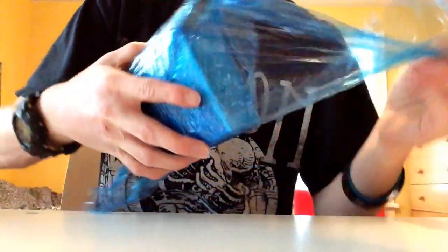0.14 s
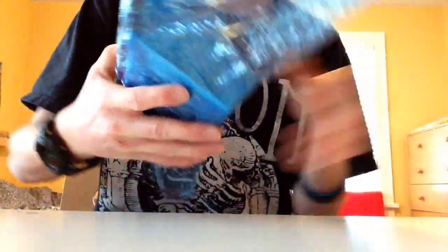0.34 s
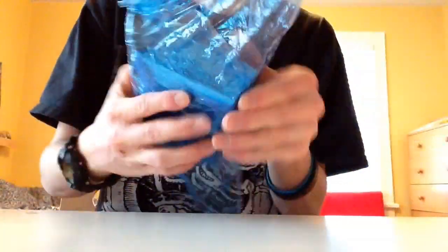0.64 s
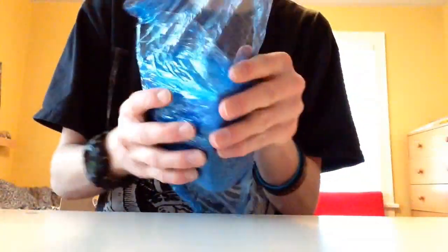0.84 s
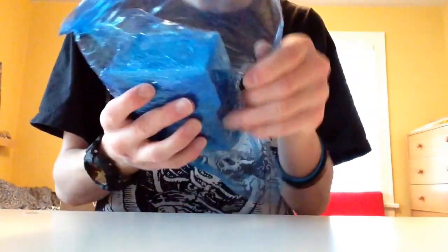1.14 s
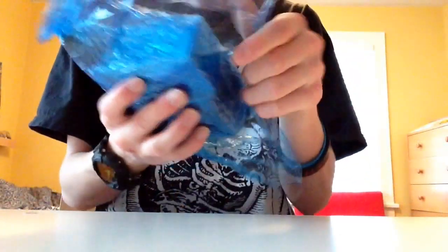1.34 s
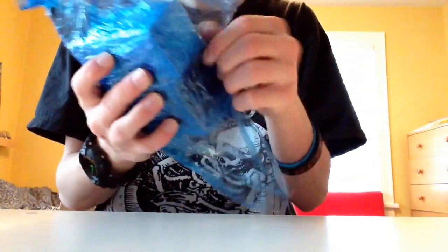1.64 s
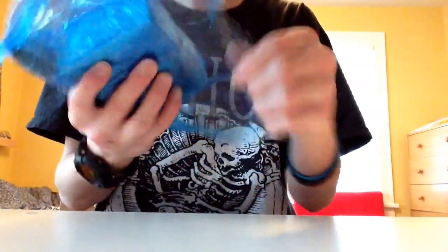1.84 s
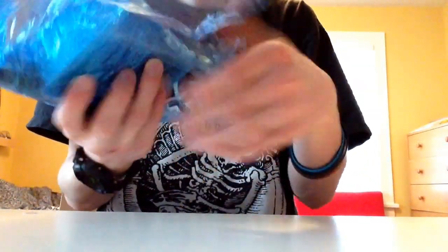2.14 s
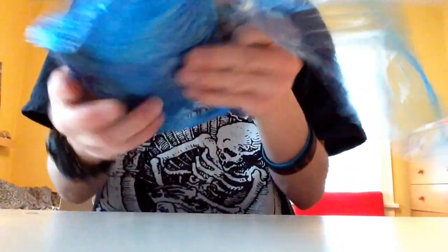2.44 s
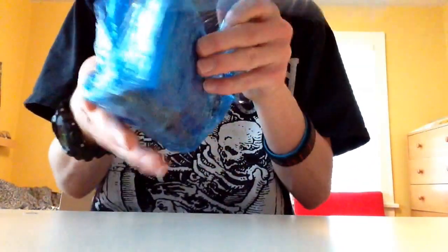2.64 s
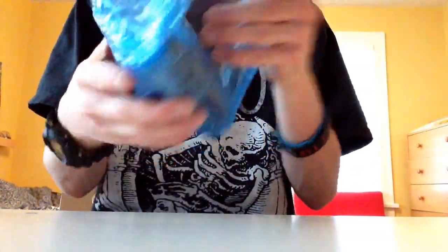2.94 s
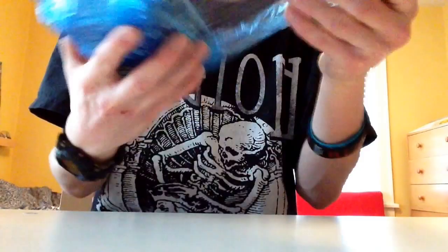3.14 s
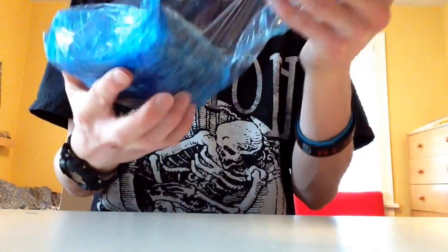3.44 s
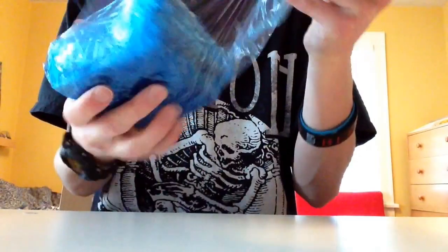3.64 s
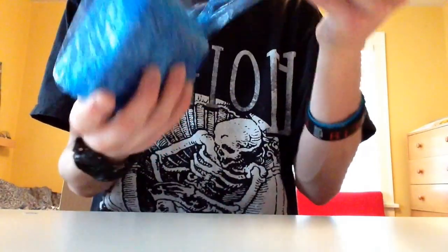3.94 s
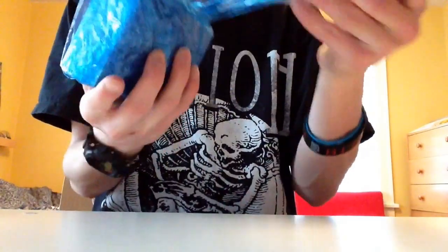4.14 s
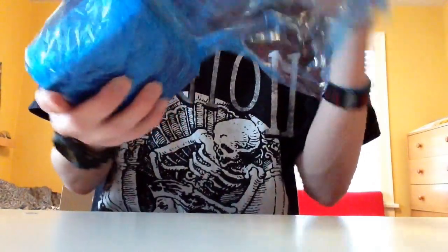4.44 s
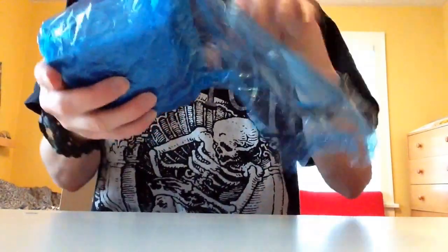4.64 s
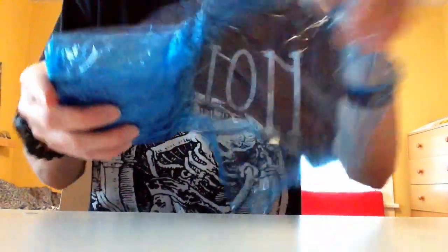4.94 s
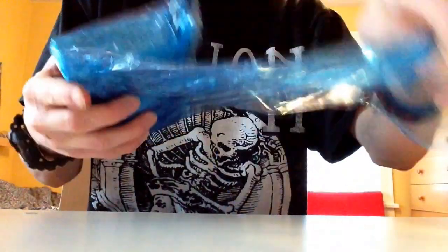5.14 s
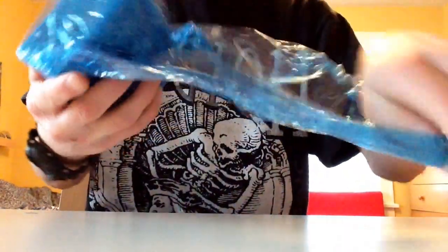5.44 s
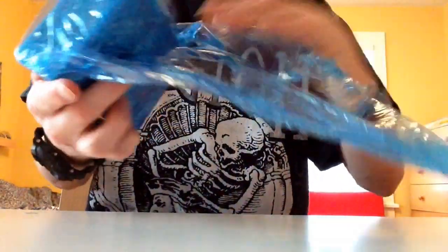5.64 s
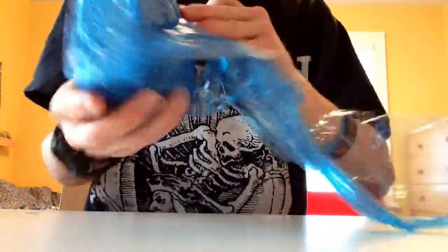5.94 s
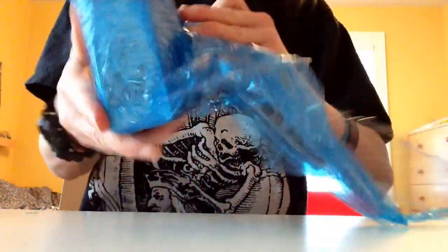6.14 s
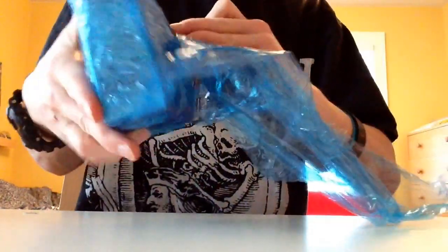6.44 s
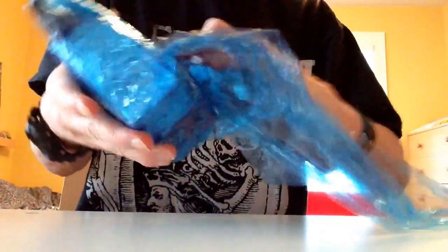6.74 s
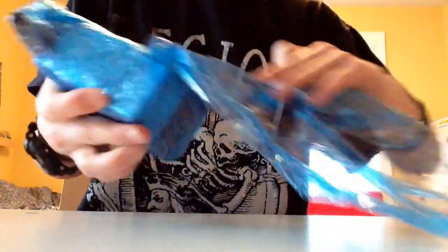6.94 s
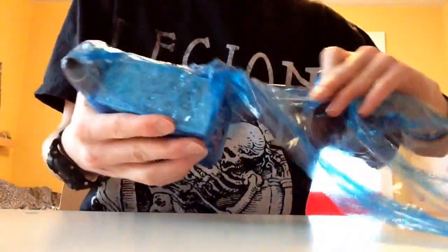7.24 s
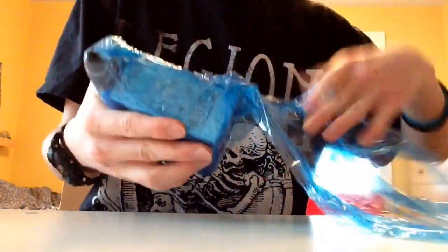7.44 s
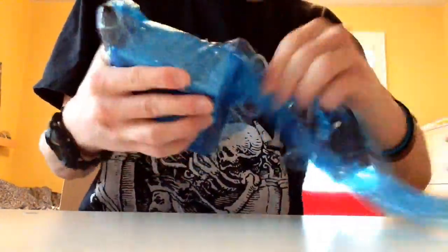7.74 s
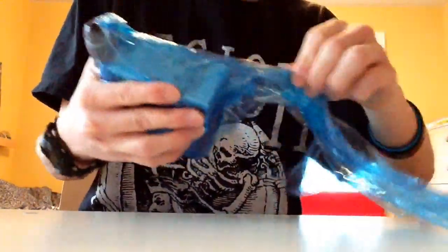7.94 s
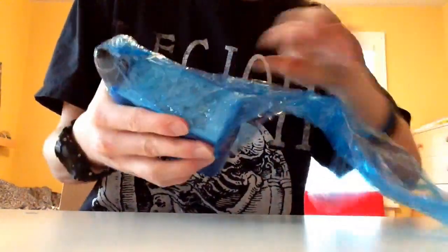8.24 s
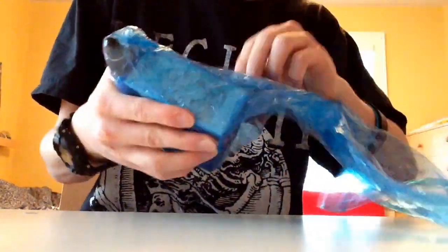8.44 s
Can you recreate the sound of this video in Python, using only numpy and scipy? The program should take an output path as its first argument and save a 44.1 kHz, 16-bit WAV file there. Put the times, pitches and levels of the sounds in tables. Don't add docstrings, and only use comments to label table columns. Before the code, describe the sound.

Close, bright crackle of thin plastic wrap being tugged and unwound at a table. Swarms of tiny creases pop, single folds snap, and stuck layers part in short buzzing rips. Activity surges early and around the middle, sinks to faint rustles, then returns with the loudest cracks near the end. Low unsteady rumble and slight thumps lie underneath, with very little room echo.

```python
import sys
import numpy as np
from scipy import signal
from scipy.fft import rfft, irfft
from scipy.io import wavfile
from scipy.ndimage import uniform_filter1d, map_coordinates

SR = 44100
rng = np.random.default_rng(int(sys.argv[2]) if len(sys.argv) > 2 else 0)


def voltage_ratio(level):
    return 10 ** (np.asarray(level, float) / 20)


def generate_wav(signal):
    frames = np.transpose(np.atleast_2d(signal))
    scaled = np.clip(frames, -1, 1) * 32767
    pcm = np.round(scaled).astype(np.int16)
    wavfile.write(sys.argv[1], SR, pcm)


N = 379260


def evened(x):
    return x / np.sqrt(np.mean(x ** 2) + 1e-20)


def read(points, hz):
    f, value = np.transpose(points)
    return np.interp(np.log(hz + 1), np.log(f + 1), value)


def along(rows):
    s, *columns = np.transpose(rows)
    return [np.interp(np.arange(N) / SR, s, c) for c in columns]


def coloured(x, points):
    gain_db = read(points, np.fft.rfftfreq(len(x), 1 / SR))
    return irfft(rfft(x) * voltage_ratio(gain_db), len(x))


def add(mix, s, sound):
    part = mix[round(s * SR):][:len(sound)]
    part += sound[:len(part)]


def wander(per_s):
    knots = rng.standard_normal(N // 64 + 2)
    span = max(int(SR / 64 / per_s), 1)
    smooth = uniform_filter1d(uniform_filter1d(knots, span), span)
    return np.repeat(evened(smooth), 64)[:N]


def surge(s, db, rise, hold, fall):
    u = np.arange(0, N, 32) / SR - s
    rise_power = 1.87
    swell = np.clip(1 + u / max(rise, .004), 0, 1) ** (2 * rise_power)
    slackening_db = 40 * np.maximum(u - hold, 0) / max(fall, .01)
    return swell * voltage_ratio(2 * db - slackening_db)


def power_db(surges, under_db):
    return 10 * np.log10(np.repeat(sum(surges), 32)[:N] + voltage_ratio(2 * under_db))


def ping(hz, cycles):
    turns = np.arange(1, 700) / SR * hz
    fade = np.exp(-turns / cycles * 2) * (1 - np.exp(-turns * 57.0))
    ring = np.sin(2 * np.pi * turns) * fade
    return ring - fade * ring.sum() / fade.sum()


def pull():
    # full_s, effort_db, rise_s, hold_s, slackening_s
    tugs = [(0.0, -37, 0.454, 0.14, 0.021), (0.63, -46.5, 0.077, 0.23, 0.2),
            (0.922, -27.5, 0.042, 0.13, 0.041), (1.694, -35, 0.26, 0.001, 0.011),
            (1.812, -23, 0.2, 0.011, 0.085), (2.041, -39.5, 0.13, 0.004, 0.32),
            (2.329, -33.5, 0.13, 0.0044, 0.022), (2.43, -35.5, 0.18, 0.001, 0.31),
            (2.892, -24.5, 0.18, 0.27, 0.065), (3.287, -46, 0.34, 0.2, 0.23),
            (3.891, -21, 0.089, 0.0061, 0.1), (4.235, -38, 0.082, 0.056, 0.16),
            (4.642, -43.5, 0.012, 0.4, 0.018), (4.966, -25, 0.077, 0.0027, 0.2),
            (5.038, -21, 0.038, 0.0099, 0.14), (5.119, -28.5, .004, 0.0018, 0.1),
            (5.11, -35, 0.0074, 0.32, 0.084), (5.667, -41, 0.065, 0.22, 0.12),
            (6.859, -24.5, 0.31, 0.062, 0.19), (7.044, -28.5, 0.038, 0.012, 0.046),
            (7.172, -21, 0.083, 0.0014, 0.16), (7.305, -41, 0.008, 0.18, 0.14),
            (7.728, -21, 0.12, 0.087, 0.056), (7.88, -33, 0.014, 0.049, 0.092),
            (8.561, -22, 0.29, 0.017, 0.055)]
    # peak_s, effort_db, length_s
    twitches = [(0.191, -44, 0.028), (0.283, -51, 0.078), (0.425, -49, 0.043), (0.531, -42.5, 0.091),
                (0.667, -37.5, 0.051), (1.217, -47, 0.034), (1.271, -33.5, 0.038), (1.473, -48.5, 0.022),
                (1.505, -44.5, 0.03), (1.632, -28.5, 0.048), (2.319, -29, 0.012), (2.887, -24, 0.0098),
                (3.144, -22, 0.011), (5.171, -31, 0.0084), (5.27, -31, 0.009), (2.467, -27, 0.028),
                (2.608, -33, 0.026), (2.706, -38.5, 0.046), (2.777, -30.5, 0.02), (3.603, -38, 0.039),
                (4.104, -39, 0.023), (4.348, -34, 0.044), (4.49, -51.5, 0.026), (4.709, -37, 0.034),
                (5.309, -28.5, 0.045), (5.557, -38, 0.035), (5.882, -36, 0.07), (5.973, -39, 0.064),
                (6.15, -42, 0.12), (6.25, -38.5, 0.056), (6.467, -37, 0.036), (6.493, -44, 0.15),
                (6.64, -37.5, 0.043), (7.649, -37, .02), (8.376, -35, .04), (8.116, -26.5, 0.03),
                (8.315, -39, 0.027), (8.332, -44.5, 0.041), (8.505, -21, 0.079)]
    # time_s, effort_db
    settling = [(0.0, -29.5), (0.329, -60), (0.763, -45.5), (1.425, -58), (2.051, -70.5), (3.564, -52),
                (4.035, -40.5), (4.516, -63.5), (5.041, -38.5), (5.491, -53.5), (6.145, -47.5),
                (6.605, -50), (7.145, -41.5), (7.674, -79), (8.022, -39.5), (8.24, -51), (8.285, -59),
                (8.6, -38)]
    surges = [surge(*row) for row in tugs]
    surges += [surge(s, db, length, 0, 0.95 * length) for s, db, length in twitches]
    return uniform_filter1d(power_db(surges, along(settling)[0]), size=200)


def crinkle():
    # lowest_hz, highest_hz, ringing_cycles
    folds = [
        (276, 1560, 1.65),
        (1440, 6000, 1.7),
        (6000, 18000, 5.5),
    ]
    # time_s, large_folds_db, fine_folds_db
    grip = [(0, -3, 0.5), (.75, -2.5, -0.5), (.97, -2, -3), (1.25, 5, 3.5), (1.5, -1.5, -4.5),
            (1.7, 1.5, -0.5), (1.95, -1.5, -2), (3.1, -2, 0.5), (3.7, -2, -9), (3.93, -1, 5.5),
            (4.6, -2, -4), (5.06, -3, -0.5), (5.3, -8, 0.5), (5.6, -2.5, -1.5), (7.18, -1.5, 0),
            (7.7, -2, 0.5), (7.99, -7, 3), (8.3, 2.5, 1.5)]
    pull_db, (large_db, fine_db) = pull(), along(grip)
    rate = 2000 * np.exp(.055 * (pull_db + 41.5))
    at = np.flatnonzero(rng.random(N) < rate / SR)
    clumps = voltage_ratio(1.5 * wander(116) + 2.0 * wander(33))
    size = voltage_ratio(0.97 * np.minimum(rng.exponential(1, N), 4.2)) * rng.choice([-1, 1], N)
    size = size * clumps / np.sqrt(rate)
    middle_db = pull_db - 10 * np.log10(1 + voltage_ratio(2 * fine_db))
    levels_db = (middle_db + large_db, middle_db, middle_db + fine_db)
    out = np.zeros(N)
    for (lo_hz, hi_hz, cycles), db in zip(folds, levels_db):
        patch = rng.integers(0, 12, N)
        share = voltage_ratio(1.5 * rng.standard_normal(N))
        layer = np.zeros(N)
        for k, hz in enumerate(np.geomspace(lo_hz, hi_hz, num=12)):
            busy_db = 3.0 * min(hz / 900, 1) * np.clip(wander(35), -2, 2)
            mine = at[patch[at] == k]
            train = np.zeros(N)
            train[mine] = (size * share * voltage_ratio(busy_db))[mine]
            shape = np.diff(ping(hz, cycles))
            layer += signal.oaconvolve(train, evened(shape) * (hz / lo_hz) ** 0.28)[:N]
        local = np.sqrt(uniform_filter1d(layer ** 2, size=3000))
        out += voltage_ratio(db) * layer / local
    return out


def pockets(x):
    # start_s, length_s, added_db, pitch_hz
    panels = [(.64, 0.034, 10, 1700), (0.723, 0.027, 8, 3200), (0.76, .03, 13, 2200), (0.93, 0.089, 3, 990),
              (1.603, 0.054, 3, 1730), (1.682, 0.037, 10, 2080), (2.9, 0.14, 8.5, 1660),
              (3.063, 0.065, 4, 3270), (5.86, .08, 4, 730), (6.805, 0.24, 8, 525), (8.352, 0.044, 7, 3320),
              (8.465, 0.17, 0, 1390)]
    width = 1.043
    out = x.copy()
    for s, length, db, hz in panels:
        part = x[round(s * SR):][:round(length * SR)]
        b, a = signal.butter(1, [hz / width, hz * width], "bandpass", fs=SR)
        faded = part * signal.windows.tukey(len(part), .5)
        add(out, s, voltage_ratio(db) * signal.lfilter(b, a, faded))
    return out


def snaps(rows, cycles):
    out, t = np.zeros(N), np.arange(500) / SR
    chances = rng.random((len(rows), 2))
    grits = rng.standard_normal((len(rows), 2, 500))
    for (s, db, hz, thump_db, edge_db), (a, b), grit in zip(rows, chances, grits):
        flurry = voltage_ratio(-15.0 - 60 * t / 0.0092) * grit[0] * abs(grit[1]) ** 1.59
        flurry[0] = 1
        crack = ping(hz, cycles) + voltage_ratio(edge_db) * ping(7500 + 5000 * b, 0.85)
        burst = np.convolve(flurry, crack)[:len(crack)]
        burst = burst * abs(crack).max() / abs(burst).max()
        thump = voltage_ratio(thump_db + 5.5) * ping(600 + 450 * a, 0.98)
        add(out, s, np.sign(grit[0, 0]) * voltage_ratio(db + 5.5) * (thump + burst))
    return out


def creases():
    # start_s, peak_db, pitch_hz, relative_edge_db
    dry_creases = [(0.5096, -23.5, 3080, -21), (.531, -26.5, 2560, -15), (0.689, -22.5, 5960, 0),
                   (0.8125, -27, 3850, -7), (0.8285, -28.5, 1830, -14), (0.9196, -18.5, 2200, -1),
                   (1.1988, -29, 2700, -2), (1.54, -28, 3730, -16), (1.606, -25, 2000, -8),
                   (1.6097, -28.5, 600, 19.5), (1.914, -30, 2220, -15), (2.1579, -27, 2880, 7),
                   (2.5982, -25.5, 2280, 5), (2.9946, -11, 2300, 9), (3.383, -22.5, 2600, -10),
                   (3.958, -21, 1270, -10), (4.089, -34, 5540, 11), (4.7, -32, 1260, -5),
                   (5.1189, -16.5, 2500, 7), (5.3342, -20, 2170, 3), (6.336, -32, 3340, -12),
                   (6.3442, -28, 3400, -2), (7.2292, -17.5, 3000, 13.5), (7.263, -20, 3230, -11),
                   (7.719, -12, 3950, -9), (7.7455, -13.5, 2980, -5), (7.838, -19, 4110, -16),
                   (7.8923, -22.5, 2520, -8), (8.027, -32, 4440, 16), (8.468, -18, 3810, -11)]
    # start_s, peak_db, pitch_hz, relative_edge_db
    flaps = [(0.0701, -29, 950, 13), (.3224, -48, 4000, 6), (0.457, -38, 1170, -18),
             (0.6296, -39, 3100, -8), (0.9661, -32, 1150, 11), (0.9916, -17, 3170, -1),
             (1.032, -13, 3510, 2), (1.8435, -13.5, 2210, 7), (2.744, -29.5, 3450, 13.5),
             (2.777, -22, 3800, 8), (2.8498, -19, 1120, 13), (3.0219, -22, 1230, 17),
             (3.489, -38, 1240, 11.5), (3.819, -30, 2020, 11.5), (4.0668, -26.5, 6900, -10),
             (4.6631, -31, 1250, -2), (5.0303, -20.5, 2440, 16), (5.0514, -17, 2170, 5),
             (5.189, -20.5, 2360, -3), (5.3078, -23, 2080, 6), (5.4296, -45, 2500, -8),
             (6.219, -30, 1740, -6), (6.8248, -13, 2380, 3), (6.891, -17, 1930, -3), (7.308, -22, 2350, 14),
             (7.9576, -29.5, 3750, -7), (8.1108, -21, 2580, 13), (8.438, -19, 3490, 0),
             (8.5108, -21, 1440, 12), (8.56, -15, 1290, 5)]
    # start_s, edge_peak_db, weak_ring_hz
    ticks = [(0.524, -23.5, 1940), (1.046, -13, 3470), (1.0675, -25, 1730), (1.175, -25, 2890),
             (1.1987, -22, 7500), (1.3790, -29, 10500), (1.431, -31, 7400), (2.0042, -19, 2440),
             (2.6608, -21, 5620), (2.719, -17.5, 1310), (2.7901, -12, 1790), (3.1839, -10.5, 1810),
             (3.2425, -19.5, 5580), (3.3657, -25.5, 5280), (3.6186, -27, 1460), (3.9463, -13, 7000),
             (3.9741, -10, 2400), (4.018, -15.5, 5990), (4.329, -13.5, 2550), (4.343, -19, 5990),
             (4.527, -39, 2390), (4.7395, -20.5, 1220), (5.146, -14, 3500), (7.0334, -7, 1656),
             (7.681, -9.5, 1770), (7.7103, -3.5, 2500), (7.752, -2, 2880), (7.786, -4, 1780),
             (7.9767, -14.5, 3040), (7.9916, -13.5, 5990)]
    tick_edge_db = 15
    # start_s, ring_db, pitch_hz, thump_db, edge_db
    rows = [(s, db, hz, -40, edge_db) for s, db, hz, edge_db in dry_creases]
    rows += [(s, db, hz, -7.5, edge_db) for s, db, hz, edge_db in flaps]
    rows += [(s, db - tick_edge_db, hz, -13, tick_edge_db) for s, db, hz in ticks]
    return snaps(rows, cycles=1.62)


def crackles():
    # start_s, peak_db, pitch_hz
    small_creases = [(0.0559, -20, 2000.0), (0.0733, -24, 940), (1.3595, -36, 9800), (0.3377, -41, 6000),
                     (0.3722, -44, 5560.0), (0.396, -50, 3290.0), (0.44, -43, 9500), (1.412, -42, 8000),
                     (3.8925, -18, 8000), (0.5563, -34, 3620.0), (0.356, -45, 7500), (0.6296, -30, 3170.0),
                     (0.8267, -27, 1940.0), (0.9387, -18, 2020.0), (1.0058, -12.5, 1680.0), (1.0398, -15, 1450),
                     (1.5117, -35, 4500), (1.2747, -29, 520.0), (1.45, -39, 7000), (1.4724, -36.5, 541),
                     (1.4997, -38, 3490), (1.6983, -23, 1660.0), (1.7907, -17, 885), (1.8083, -16, 1720.0),
                     (1.8435, -14, 1660.0), (1.575, -40, 2310), (1.6565, -20, 1400), (2.1754, -40, 2950.0),
                     (2.183, -42, 3050), (2.2439, -29.5, 2480.0), (2.32, -28, 3020), (2.3888, -32.7, 1960.0),
                     (2.5123, -27, 1690), (2.835, -22, 900), (2.7254, -25.5, 2610.0), (2.9509, -11, 1450),
                     (2.978, -13, 870), (2.9945, -17, 1570.0), (3.071, -19, 1790.0), (3.0886, -13, 1570.0),
                     (3.171, -19, 3290.0), (3.2293, -32, 3570.0), (3.2548, -32, 2890.0), (3.4958, -36.6, 1980.0),
                     (3.5276, -38.6, 4800.0), (3.541, -39, 3060.0), (3.8485, -21, 2000), (3.7032, -40.8, 2020.0),
                     (3.7297, -40, 1940.0), (3.867, -15.5, 650.0), (3.8852, -11.5, 1370), (3.9103, -16, 950.0),
                     (3.911, -15, 6200), (4.0923, -30.5, 2840.0), (4.129, -34.7, 1460.0),
                     (4.4324, -41, 2070.0), (4.5816, -42, 517), (4.4915, -50, 9500), (4.7106, -37, 2650.0),
             (4.7998, -34.5, 3210.0), (4.921, -31, 1790.0), (4.9687, -26, 980), (4.978, -19, 2240.0),
             (5.0469, -14.5, 2580.0), (5.1027, -22, 2130.0), (4.543, -49, 6950), (5.229, -25, 1980),
             (5.292, -22.5, 3570.0), (5.3752, -36, 4480.0), (5.45, -33, 1000), (5.6095, -37, 4760.0),
             (5.6193, -41, 4370.0), (5.698, -30, 2370.0), (5.725, -32, 1940.0), (5.787, -31, 2670.0),
             (6.0169, -34, 5080.0), (6.2598, -33, 3450.0), (6.5097, -45, 2110.0), (6.7068, -31, 2130.0),
             (6.836, -14.5, 700), (6.9403, -13, 1880), (4.4126, -43, 7900), (7.112, -24, 4690.0),
             (7.171, -7.5, 1100), (7.1487, -17, 3360), (7.18, -14, 556), (7.8185, -12, 11500),
             (7.8845, -23.5, 11000), (7.57, -38.5, 710.0), (7.676, -18.5, 3680.0), (7.703, -24, 3830.0),
             (4.4794, -50, 7900), (7.9635, -22, 11200), (7.7587, -20, 950.0), (7.7627, -21, 1960.0),
             (7.7966, -8, 12000), (7.807, -10.5, 4010.0), (7.8736, -23, 2000.0), (7.973, -29.9, 4630),
             (8.0136, -35, 3250.0), (8.0364, -27.5, 4950.0), (8.0607, -35, 3340.0), (8.1894, -36, 2220.0),
             (8.073, -35, 3500), (8.3006, -38, 1360.0), (8.3677, -36, 1100.0), (8.3931, -22, 2800),
             (8.5173, -18, 1490.0), (8.53, -7.5, 1550.0), (8.566, -15, 1070)]
    level_db, thump_db, edge_db = -3, -18.5, 2
    rows = [(s, db + level_db, hz, thump_db, edge_db) for s, db, hz in small_creases]
    return snaps(rows, cycles=1.6)


def slips():
    # start_s, peak_db, slips_per_s, length_s, ring_hz
    releases = [(0.648, -35, 560, 0.013, 1970), (0.736, -41, 620, 0.013, 3100),
                (0.766, -31.5, 1000, 0.015, 3900), (1.608, -21, 610, 0.0056, 1820),
                (1.704, -21, 400, 0.0085, 1960), (2.968, -18, 210, 0.012, 5500),
                (3.85, -29, 340, 0.0063, 900), (5.032, -17.5, 210, 0.019, 466),
                (5.428, -23, 990, 0.002, 750), (6.821, -17, 295, 0.0067, 614),
                (6.895, -21, 220, 0.014, 490), (7.039, -30, 246, 0.0073, 376),
                (7.171, -10, 475, 0.014, 695), (8.109, -33, 404, 0.0094, 350),
                (8.296, -46, 120, .012, 3300), (0.967, -24, 320, 0.04, 1050),
                (1.626, -24, 500, 0.0058, 800), (1.787, -34, 270, 0.013, 900),
                (1.808, -19, 380, 0.0069, 800), (2.905, -21.5, 350, 0.033, 1180),
                (2.967, -29, 280, 0.014, 1000), (3.005, -18.5, 290, 0.03, 1320),
                (3.095, -23, 260, 0.023, 1150), (3.14, -22, 300, 0.016, 453)]
    out = np.zeros(N)
    for s, db, per_s, length, hz in releases:
        for k, (a, b, c) in enumerate(rng.random((int(per_s * length) + 1, 3))):
            flap = ping(hz * (0.67 + 0.75 * b), 1.9) + .5 * ping(hz * (1.66 + 0.52 * c), 2.1)
            jerk = flap + .3 * ping(3000 + 4000 * c, 13.0)
            jerk_db = db + 3.5 - 1.0 * a - 5 * k / per_s / length
            add(out, s + (k + 0.28 * a) / per_s, voltage_ratio(jerk_db) * jerk)
    return out


def knocks():
    # start_s, peak_db, pitch_hz, t60_s
    strokes = [(1.6052, -18, 1870, .014), (1.6098, -14, 1780, 0.011), (1.6205, -20, 1670, .015),
               (4.578, -45, 337, 0.39), (6.835, -17, 650, 0.037), (7.042, -19.5, 322, 0.034),
               (7.1725, -15.5, 494, 0.087)]
    out, t = np.zeros(N), np.arange(SR // 4) / SR
    for s, db, hz, t60 in strokes:
        add(out, s, voltage_ratio(db - 60 * t / t60) * np.sin(2 * np.pi * hz * t))
    return out


def table(x):
    # time_s, first_dip_hz, strength (0-1)
    dip = [(0, 7200, 0.31), (1.1, 7060, 0.27), (1.7, 6000, 0.29), (2.5, 6000, 0.3), (2.85, 4400, 0.11),
           (3.25, 4560, 0.33), (3.5, 6000, 0.27), (3.85, 4050, 0.24), (4.5, 4100, 0.31), (5.2, 7650, 0.27),
           (6.5, 8300, 0.16), (7.3, 10800, 0.5), (7.7, 7300, 0.36), (7.95, 7150, 0.52), (8.2, 10300, 0.67),
           (8.6, 8650, 0.33)]
    dip_hz, bounce = along(dip)
    echo = map_coordinates(x, [np.arange(N) - SR / (2 * dip_hz)], order=3)
    return (x + bounce * echo) / np.sqrt(1 + bounce ** 2)


def room(x):
    # frequency_hz, t60_s
    decay = [(200, .22), (1000, .15), (4000, .12), (14000, .08)]
    taps = np.zeros((2, SR // 3))
    at = np.arange(120, SR // 3 - 20, 20)
    places = at + rng.integers(0, 20, (2, len(at)))
    np.put_along_axis(taps, places, rng.choice([-1., 1.], (2, len(at))), 1)
    hz, t, z = signal.stft(taps, SR, nperseg=256)
    fade = voltage_ratio(-60 * t / read(decay, hz)[:, None])
    tails = signal.istft(z * fade, SR, nperseg=256)[1]
    turn = 2 * np.pi * 2.3 * np.arange(N) / SR
    feeds = x * np.array([np.cos(turn), np.sin(turn)])
    return signal.oaconvolve(feeds, tails / np.linalg.norm(tails[0]), axes=1).sum(0)[:N]


def jolts():
    # peak_s, level_db, build_up_s
    shakes = [(0, -42, .05), (1.82, -37, 0.23), (2.86, -34, .02), (3.16, -31.5, 0.47), (3.6, -45.5, .03),
              (3.88, -39, 0.097), (5.05, -34.5, 0.18), (6.9, -42, 0.43), (7.2, -30.5, 0.044),
              (7.74, -39, 0.054), (8.112, -40, .005), (8.56, -32, 0.085)]
    # frequency_hz, level_db
    colour = [(25, -25), (60, -18.5), (150, -3), (230, -11), (350, -33.5)]
    level_db = power_db([surge(*row, 0, 0.11) for row in shakes], -100)
    return evened(coloured(rng.standard_normal(N), colour)) * voltage_ratio(level_db)


def rumble():
    # time_s, level_db
    course = [(0, -47), (.31, -56), (1.03, -50), (2.1, -47.5), (2.7, -53.5), (4, -56), (4.35, -50),
              (4.6, -64), (5.3, -55.5), (6, -43), (6.4, -59), (7.4, -48), (8, -57), (8.6, -50)]
    # frequency_hz, level_db
    modes = [(25, -28), (50, -12.5), (85, -9.5), (100, 3.5), (116, -6), (135, 0.5), (155, -18), (180, -10),
             (210, -10), (320, -31.5)]
    noise = evened(coloured(rng.standard_normal(N), modes)) * voltage_ratio(along(course)[0])
    return noise * voltage_ratio(3.2 * wander(6.8) - 1.5)


def hums():
    # start_s, length_s, level_db, pitch_hz
    low_swells = [(4.349, 0.22, -57, 98), (4.98, 0.15, -34, 48), (5.75, 0.54, -59, 177),
                  (5.8, 0.36, -52, 116.7), (6.001, 0.27, -54, 97.5), (6.08, 0.16, -50, 140)]
    out = np.zeros(N)
    for s, length, db, hz in low_swells:
        t = np.arange(0, length, 1 / SR)
        waver = 1 + 0.016 * np.sin(2 * np.pi * 3.7 * t)
        tone = np.sin(2 * np.pi * np.cumsum(hz * waver) / SR)
        add(out, s, voltage_ratio(db) * np.sin(np.pi * t / length) * tone)
    return out


def hiss():
    # frequency_hz, level_db
    colour = [(200, 12), (3000, -12), (15000, -67)]
    return voltage_ratio(-71) * evened(coloured(rng.standard_normal(N), colour))


def scene():
    swarm = voltage_ratio(-4.0) * pockets(crinkle())
    film = table(swarm + creases() + slips() + crackles()) + knocks()
    background = jolts() + rumble() + hums() + hiss()
    return (film + voltage_ratio(-16.0) * room(film) + background)[None]


def band_limit(x):
    return signal.sosfilt(signal.butter(12, 16470, fs=SR, output="sos"), x)


def record(dry):
    # frequency_hz, level_db
    microphone = [(20, -24), (60, -4.5), (200, -4), (470, -2.5), (700, -4), (950, 0.5), (1250, -3),
                  (2000, 0.5), (5000, 3.5), (12000, 5), (15200, 2), (15700, -43)]
    mix = coloured(dry[0], microphone)[None]
    return band_limit(mix)


dry = scene()
out = record(dry)
generate_wav(out)
```